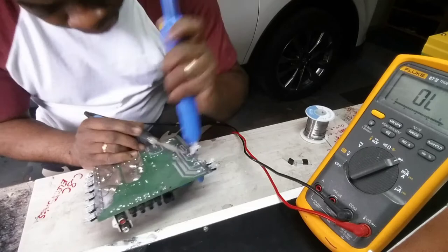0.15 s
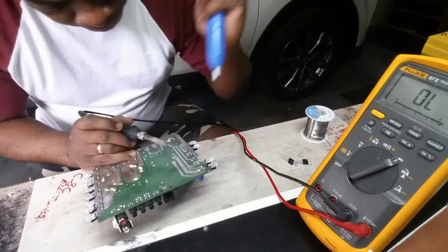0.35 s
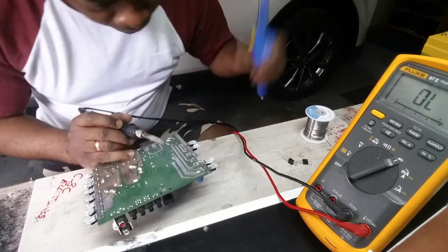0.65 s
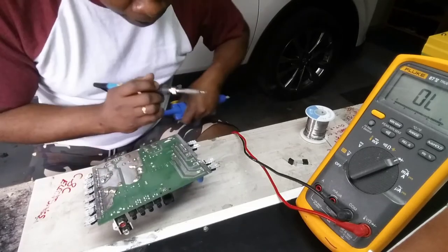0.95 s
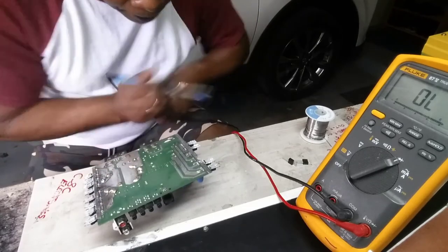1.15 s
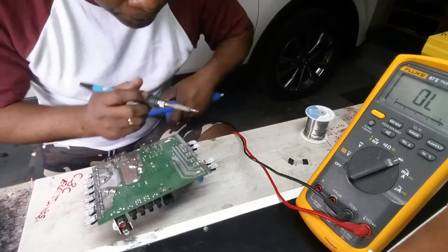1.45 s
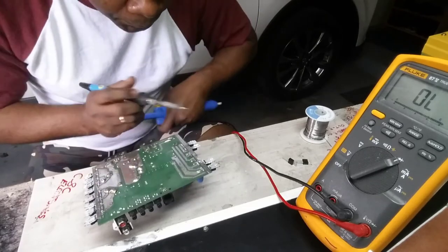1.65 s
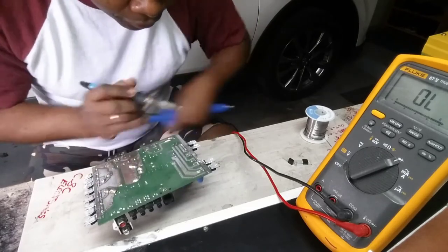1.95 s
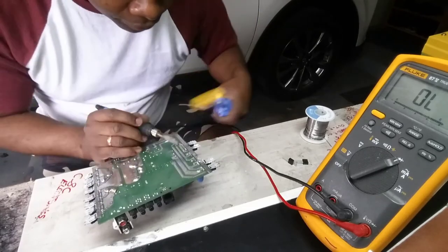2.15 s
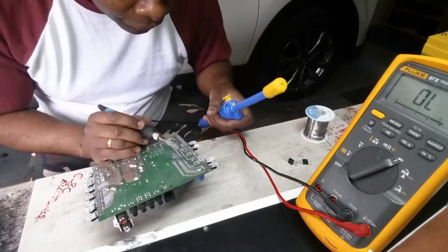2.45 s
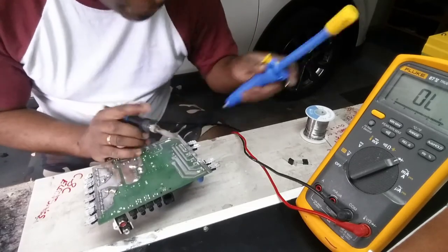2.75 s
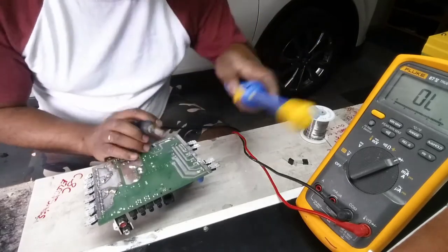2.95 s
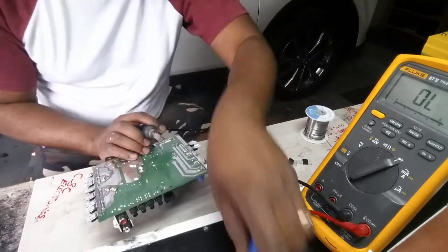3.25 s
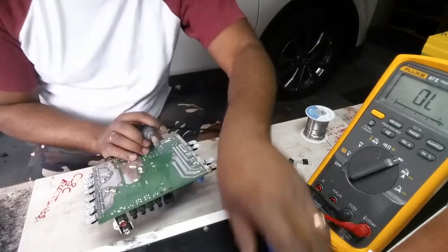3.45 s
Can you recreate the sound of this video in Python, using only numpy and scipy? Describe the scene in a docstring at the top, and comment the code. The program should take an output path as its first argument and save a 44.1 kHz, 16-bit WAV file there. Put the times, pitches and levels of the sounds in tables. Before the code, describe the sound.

A solder sucker snaps, scrapes and clicks as it is reset, then is set down.

```python
"""Mains hum fills a garage throughout. At 0.1 s a plastic desoldering pump snaps over a circuit board,
exciting the resonances of its wall and air column and shaking the bench. From 1 s to 2 s its plunger is
worked to and fro, scraping by friction and clicking. A hard clack, a few dull taps on the bench and a
second clack follow; from 3.4 s the pump is laid down and rocks, each contact a hollow knock.
The two microphone ports colour it all, each resonating at its own treble pitch."""
import sys
import numpy as np
from scipy import signal
from scipy.fft import rfft, irfft, next_fast_len
from scipy.io import wavfile
from scipy.ndimage import uniform_filter1d, map_coordinates

SR = 44100
rng = np.random.default_rng(int(sys.argv[2]) if len(sys.argv) > 2 else 0)


def to_wav(sig):
    """Store sig (one row per channel, or 1-D mono) as 16-bit WAV at the path in sys.argv[1].

    Samples outside -1..1 are clipped; the rate is SR.
    """
    pcm = np.clip(np.atleast_2d(sig), -1, 1) * 32767
    pcm = np.round(pcm).astype(np.int16)
    wavfile.write(sys.argv[1], SR, pcm.T)  # frames by channels


N = 158760

# Envelope of hum and room rumble together: (time [s], level [dB])
HUM_ENVELOPE = [(0.0, -38.5), (0.05, -35), (0.1, -45.5), (0.94, -56), (0.99, -49.5), (1.45, -46.5),
                (1.54, -50), (2.34, -51.5), (3.04, -39.5), (3.061, -44), (3.22, -35.5), (3.47, -39),
                (3.5, -51), (3.55, -32.5), (3.6, -47.5)]
# Mains tone: (frequency [Hz], relative level [dB])
MAINS_TONES = [(59.4, 1.5)]
# Room rumble: (frequency [Hz], relative spectral density [dB])
RUMBLE_SPECTRUM = [(25, -22), (45, -13.5), (70, -7), (120, -8), (250, -27), (600, -41), (1500, -50),
                   (4000, -68), (9000, -74)]
# Plunger strokes and rubbing: (start [s], rise [s], hold [s], fade [s], level [dB], tilt [dB/octave],
# air column gain [dB], favoured frequency [Hz])
FRICTION_STROKES = [(0.0, .02, .05, .03, -77, -13, 3, 2017),
                    (0.116, 0.0056, 0.035, 0.16, -44.5, -4.5, -3, 4500),
                    (0.975, 0.017, 0.041, 0.17, -57, 1, 3.5, 2060),
                    (1.141, 0.041, 0.012, 0.2, -33, 0.5, 2.5, 3070),
                    (1.337, 0.054, 0.052, 0.042, -30, 2.5, 5.5, 3060),
                    (1.512, 0.0024, 0.0083, 0.25, -41.5, -2.5, 4.5, 3260),
                    (1.726, 0.026, 0.059, 0.03, -35, 0.5, 6, 2450),
                    (1.948, 0.041, 0.043, 0.1, -29.5, 1.9, 6, 1670),
                    (2.743, 0.036, 1, .1, -84.5, -4, -8, 3017),
                    (3.372, 0.0091, 0.02, 0.06, -42, -12, -8, 3450),
                    (3.507, .01, 0.065, 0.026, -52.5, -10, -14, 3420)]
# Resonances of the plastic wall: (frequency [Hz], bandwidth [Hz], gain [dB])
WALL_MODES = [(1700, 3800, -10.5), (5630, 4400, 1), (11470, 15000, 3.5)]
# Resonances of the air column in the tube: (frequency [Hz], bandwidth [Hz], gain [dB])
AIR_MODES = [(1020, 140, -13), (2200, 220, -6.5), (3130, 220, -6.5), (4020, 260, -6), (5100, 350, -10)]
# Contacts of plunger and pump: (time [s], drive level [dB], decay time [ms], bench shake [dB],
# tilt [dB/octave])
PUMP_CLICKS = [(0.073, -25.5, 5.2, -48, -5), (0.0977, -10, 1.95, -42.5, -5), (0.1012, -17, 3.2, -62, -4.5),
               (0.1109, -23, 6.5, -32.5, -3.5), (.142, -27, 4.4, -38.5, -4), (0.4176, -61.5, 7.9, -65, -11),
               (0.5035, -61.5, 19, -64, -8), (1.0005, -42.5, 9, -76, 3), (1.1455, -42.5, 3.3, -75, 0),
               (1.2121, -18, 2.9, -34.5, -4.5), (1.3134, -22, 5.8, -47.5, -3.5),
               (1.3437, -33.5, 17, -64, 1), (1.486, -34, 5.2, -62, 0), (1.4948, -17.5, 5.9, -40.5, -1),
               (1.5089, -14.5, 5.1, -29.5, -0.5), (1.6598, -35, 6.9, -60.5, -5), (1.7452, -26, 2, -83, 3.5),
               (1.806, -24, 7.8, -35, -5.5), (1.9236, -20, 4.04, -56.5, -4), (2.8, -63.5, 10.2, -81, -5),
               (3.342, -46, 5.2, -53, -13), (3.3827, -21.5, 3.8, -21, -11),
               (3.4938, -21.5, 7.2, -23.5, -14.5), (3.556, -30.5, 4.3, -31, -12),
               (3.5714, -30.5, 7.9, -32, -17)]
# Modes of the bench: (frequency [Hz], level [dB], T60 [s])
BENCH_MODES = [(110, -2, 0.13), (235, -7, 0.15), (285, -0.5, 0.054), (613, -8, 0.059), (699, -14.5, 0.11),
               (818, -16.5, .05), (1112, -16.5, 0.035), (1654, -31.5, 0.056)]
# Loose parts on the bench: (frequency [Hz], relative spectral density [dB])
RATTLE_SPECTRUM = [(60, -14.5), (150, 5), (500, -5), (1200, -14), (2500, -40), (4500, -55.5), (16000, -64)]
# Dull taps on the bench: (time [s], level [dB], tilt [dB/octave], gain of the lowest mode [dB])
BENCH_TAPS = [(.105, -38, -2.5, 13), (0.131, -34, -2, 10), (0.147, -27, 5, 1.5), (0.157, -36, 3, -8),
              (0.177, -32, 3, 7), (.187, -32.5, 4.5, -10), (0.2007, -32, 4, 17.5), (0.209, -37.5, -1, 15),
              (0.2362, -28, 2.5, 4.5), (0.243, -41.5, -4.5, -3), (0.475, -40.5, -2, -2),
              (.488, -52, -2, -7.5), (.714, -47.5, -7, -7), (1.303, -44.5, 5.5, -8.5),
              (1.514, -36, -3.5, 4.5), (1.913, -44.5, 3.5, -5.5), (2.75, -34.5, -1, -6),
              (2.793, -38, -0.5, 9), (2.882, -34.5, -1, 3.5), (2.942, -44.5, -9.5, -1)]
# Harder hollow taps: (time [s], level [dB])
CASE_CLACKS = [(2.3555, -43.5), (3.191, -31)]
# Modes of the clacking case: (frequency [Hz], level [dB], T60 [s])
CASE_MODES = [(124, -1.5, 0.44), (220.9, 2, 0.28), (615, -19.5, 0.85), (682, -2.5, 0.068),
              (780, -4.5, 0.04), (1125, 5, 0.031), (1230, 0.5, 0.018), (1515, -6.5, 0.037),
              (1964, -21, 0.061), (2680, -15.5, 0.02), (7000, -36, 0.051)]
# Contacts of the pump as it is laid down and rocks: (time [s], level [dB])
ROCKING_CONTACTS = [(3.363, -32), (3.385, -12.5), (3.3882, -15), (3.412, -25), (3.4946, -11), (3.5358, -15),
                    (3.572, -12.5), (3.5905, -15.5)]
# Modes of its hollow knock: (frequency [Hz], level [dB], T60 [s])
HOLLOW_MODES = [(262.2, -4.5, 0.089), (282.5, -10.5, 0.31), (301.2, -0.5, 0.072), (346, -13.5, 0.13),
                (517, -24, 0.15), (718, -24, 0.14), (1036, -27, 0.05)]
# Reverberation time of the garage: (frequency [Hz], T60 [s])
GARAGE_T60 = [(100, .5), (600, 0.39), (7000, 0.26), (15000, 0.18)]
# Likeness of left and right noise: (frequency [Hz], correlation [-1 to 1])
STEREO_CORRELATION = [(60, 0.62), (180, 1), (550, 0.53), (1000, 0.38), (1420, -0.87), (2200, .2),
                      (4970, -0.3), (15000, -0.3)]
# Responses of the two microphone ports: (frequency [Hz], gain [dB])
LEFT_RESPONSE = [(60, -1), (300, 2.5), (1100, 3), (4000, 10), (5500, 13), (6900, 17), (7600, 9.5),
                 (8500, -10), (10000, -2.5), (16000, 1.5)]
RIGHT_RESPONSE = [(60, -2), (300, -0.5), (850, -1), (1100, -0.5), (4000, 1), (5500, -4.5), (7500, -5.5),
                  (8500, 2), (9800, 7.5), (12000, 4), (16000, 0)]

BENCH_RATTLE = dict(rattle_db=-7, rattle_t60=0.06, room_db=-13)
CASE_RATTLE = dict(rattle_db=2, rattle_t60=0.25, room_db=-8)
GRAIN_DB, SURGE_DB, COLOUR_DB = 2.2, 0.6, 2  # friction: fast, slow and spectral fluctuation
FOCUS_DB, AIR_WAVER_DB = 7, 4  # air modes: loss an octave from the favoured frequency, unsteadiness
BLOW_TIME = np.arange(SR // 2) / SR  # time axis of one impact [s]


def amp(db):
    """Amplitude ratio of a level in decibels."""
    return 10 ** (np.asarray(db) / 20)


def unit_rms(x):
    """Normalisation to unit mean power."""
    return x / np.sqrt(np.mean(x ** 2) + 1e-20)


def along(points, hz):
    """Interpolation of (frequency, value) points on a logarithmic frequency axis."""
    knots, values = np.transpose(points)
    return np.interp(np.log(hz + 1), np.log(knots + 1), values)


def wobble(rate):
    """Smooth random fluctuation: a spline through `rate` knots a second."""
    return map_coordinates(rng.standard_normal(int(N * rate / SR) + 4), [np.arange(N) * rate / SR])


def filtered(x, response):
    """Linear filtering: the spectrum is multiplied by a complex frequency response."""
    size = 2 * next_fast_len(x.shape[-1] // 2 + 4096)
    return irfft(rfft(x, size) * response(np.fft.rfftfreq(size, 1 / SR)), size)[..., :x.shape[-1]]


def minimum_phase(points):
    """Causal response through (frequency, gain) points, by folding the cepstrum."""
    def response(hz):
        cepstrum = irfft(np.log(amp(along(points, hz))))
        half = len(cepstrum) // 2
        return np.exp(rfft(np.r_[cepstrum[0], 2 * cepstrum[1:half], cepstrum[half], np.zeros(half - 1)]))
    return response


def stereo_noise(size):
    """Partial coherence: left and right white noise, alike in the bass."""
    def weights(hz):
        angle = np.arccos(np.clip(along(STEREO_CORRELATION, hz), -1, 1)) / 2
        return np.array([np.cos(angle), np.sin(angle)])
    mid, side = filtered(rng.standard_normal((2, size)), weights)
    return np.array([mid + side, mid - side])


def garage(x, wet_db):
    """Reverberation: a diffuse tail, decaying at its own rate in each band, joins the direct sound."""
    hz, t, spectrum = signal.stft(stereo_noise(SR // 2), SR, nperseg=256)
    decay = amp(-60 * t / along(GARAGE_T60, hz)[:, None])
    tail = signal.istft(spectrum * decay, SR, nperseg=256)[1]
    delayed = np.pad(x, ((0, 0), (200, 0)))
    wet = signal.fftconvolve(delayed, tail / np.linalg.norm(tail[0]), axes=1)
    return x + amp(wet_db) * wet[:, :x.shape[1]]


def mains_hum():
    """Superposition: a slightly wavering mains tone and the room's rumble share one envelope."""
    times, levels_db = np.transpose(HUM_ENVELOPE)
    t = np.arange(N) / SR
    phase_drift = 0.8 * wobble(6.5)
    mains = sum(amp(db + 0.5 * wobble(22)) * np.sqrt(2) * np.sin(2 * np.pi * hz * t + phase_drift)
                for hz, db in MAINS_TONES)
    rumble = unit_rms(filtered(stereo_noise(N), lambda hz: amp(along(RUMBLE_SPECTRUM, hz))))
    rumble *= amp(-8 + 4.1 * wobble(11))
    return amp(np.interp(t, times, levels_db)) * (mains + rumble)


def resonance(hz, centre, width):
    """Band-pass response of a damped harmonic oscillator."""
    return 1j * hz * width / (centre ** 2 - hz ** 2 + 1j * hz * width)


def barrel(x, tilt_db, air_db):
    """Forced resonance: wall and air modes respond in parallel, neighbours in opposite polarity."""
    def responses(hz, modes):
        tilt = amp(tilt_db * np.log2(hz / 6000 + 0.17))
        return np.array([(-1) ** k * tilt * amp(db) * resonance(hz, centre, width)
                         for k, (centre, width, db) in enumerate(modes)])
    wall = filtered(x, lambda hz: responses(hz, WALL_MODES).sum(axis=0))
    detuned = [(centre * rng.normal(1, 0.025), width, db) for centre, width, db in AIR_MODES]
    air = filtered(x[None], lambda hz: responses(hz, detuned)[:, None])  # one stereo pair per mode
    return wall + np.sum(amp(air_db) * air, axis=0)


def plunger_strokes():
    """Sliding friction: grainy noise drives the barrel, its colour shifting as the plunger moves."""
    t, out = np.arange(SR) / SR, np.zeros((2, N))
    for start, rise, hold, fade, db, tilt_db, column_db, focus_hz in FRICTION_STROKES:
        shape_db = np.interp(t, np.cumsum([0, rise, hold, fade]), [-19, 1.5, 3.5, -33])
        envelope = amp(db + shape_db) * (t < rise + hold + fade)
        grain = amp(GRAIN_DB * wobble(900) + SURGE_DB * wobble(60))[:SR]
        mode_db = [column_db - FOCUS_DB * np.log2(hz / focus_hz) ** 2 for hz, *_ in AIR_MODES]
        air_db = np.array([[level + AIR_WAVER_DB * wobble(45)[:SR]] for level in mode_db])
        friction = unit_rms(barrel(grain * stereo_noise(SR), tilt_db, air_db))
        spectrum = signal.stft(friction, nperseg=256)[2]
        colour = uniform_filter1d(rng.standard_normal(spectrum.shape[1:]), size=3, axis=0)
        colour = uniform_filter1d(colour, size=10, axis=1)  # now smooth in frequency and in time
        rasp = signal.istft(spectrum * amp(COLOUR_DB * unit_rms(colour)), nperseg=256)[1][:, :SR]
        add(out, start, envelope * rasp)
    return garage(out, wet_db=-8.5)


def add(track, start, x):
    """Superposition of x on the track from `start` seconds."""
    part = track[:, round(start * SR):][:, :x.shape[-1]]
    part += x[..., :part.shape[1]]


def pump_clicks():
    """Impact excitation: a brief chatter of contacts rings the barrel and shakes the bench."""
    t, out = BLOW_TIME, np.zeros((2, N))
    for start, db, decay_ms, shake_db, tilt_db in PUMP_CLICKS:
        envelope = (1 - np.exp(-t / 0.0005)) * np.exp(-(t / (decay_ms / 1000)) ** 1.4)
        chatter = amp(db) * envelope * stereo_noise(len(t))
        add(out, start, garage(barrel(chatter, tilt_db, air_db=0.33), wet_db=-10))
        add(out, start, blow(shake_db, BENCH_MODES, tilt_db=2, attack_s=0.002, **BENCH_RATTLE))
    return out


def ring(modes, tilt_db, attack_s):
    """Free vibration: a sum of damped sinusoids whose levels scatter from blow to blow."""
    t, vibration = BLOW_TIME, 0
    for hz, db, t60 in modes:
        level_db = db + tilt_db * np.log2(hz / 300) + rng.normal(0, 1.5)
        vibration += amp(level_db - 60 * t / t60) * np.sin(2 * np.pi * hz * t)
    return (1 - np.exp(-t / attack_s)) * vibration


def blow(db, modes, tilt_db, attack_s, rattle_db, rattle_t60, room_db):
    """Structure-borne sound: a struck body rings and loose parts on the bench rattle."""
    t = BLOW_TIME
    colour = minimum_phase([(hz, level + tilt_db * np.log2(hz / 300)) for hz, level in RATTLE_SPECTRUM])
    rattle = unit_rms(filtered(stereo_noise(len(t)), colour)) * amp(rattle_db - 60 * t / rattle_t60)
    return amp(db) * garage(ring(modes, tilt_db, attack_s) + rattle, room_db)


def bench_taps():
    """Modal excitation: each dull tap drives the lowest mode of the bench to a different degree."""
    out = np.zeros((2, N))
    (hz, level, t60), *upper_modes = BENCH_MODES
    for start, db, tilt_db, push_db in BENCH_TAPS:
        modes = [(hz, level + push_db, t60), *upper_modes]
        add(out, start, blow(db, modes, tilt_db, attack_s=0.0014, **BENCH_RATTLE))
    return out


def case_clacks():
    """Hard impact: a short contact gives a hollow case a fast onset and stronger upper modes."""
    out = np.zeros((2, N))
    for start, db in CASE_CLACKS:
        add(out, start, blow(db, CASE_MODES, tilt_db=2.6, attack_s=0.00039, **CASE_RATTLE))
    return out


def pump_rocking():
    """Repeated impact: each contact of the rocking pump excites the same hollow modes."""
    out = np.zeros((2, N))
    balance = amp([[1.5], [-1.5]])  # a little to the left
    for start, db in ROCKING_CONTACTS:
        knock = amp(db) * ring(HOLLOW_MODES, tilt_db=0, attack_s=0.0015)
        add(out, start, garage(knock * balance, wet_db=-19))
    return out


def scene():
    """Linear superposition: the sound pressures of all sources add."""
    return pump_clicks() + plunger_strokes() + bench_taps() + case_clacks() + pump_rocking() + mains_hum()


def record(dry):
    """Port resonance colours each channel; faint self-noise and a band limit follow."""
    def band_limit(hz, top_hz=15950, edge_hz=400):
        return np.sin(np.pi / 2 * np.clip((top_hz - hz) / edge_hz, 0, 1)) ** 2
    left = filtered(dry[0], minimum_phase(LEFT_RESPONSE))
    right = filtered(dry[1], minimum_phase(RIGHT_RESPONSE))
    self_noise = amp(-90) * rng.standard_normal(dry.shape)
    return filtered(np.array([left, right]) + self_noise, band_limit)


dry = scene()
out = record(dry)
to_wav(out)
```